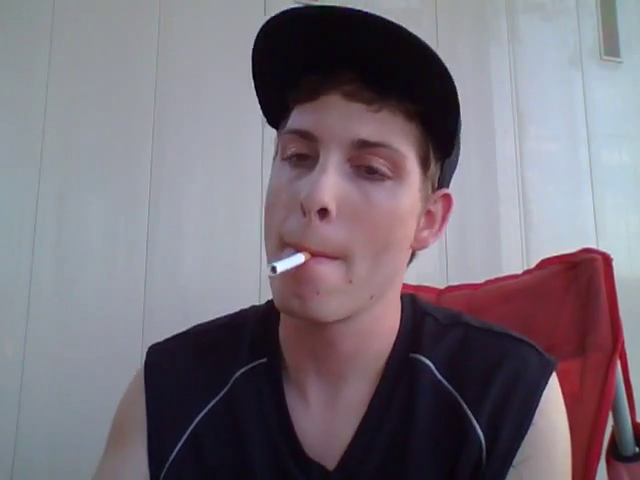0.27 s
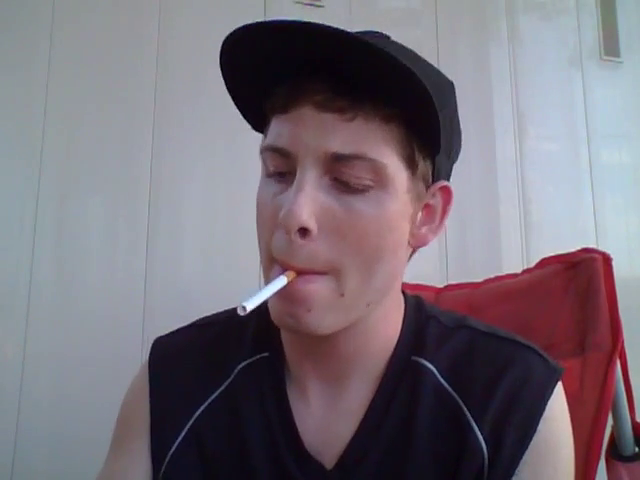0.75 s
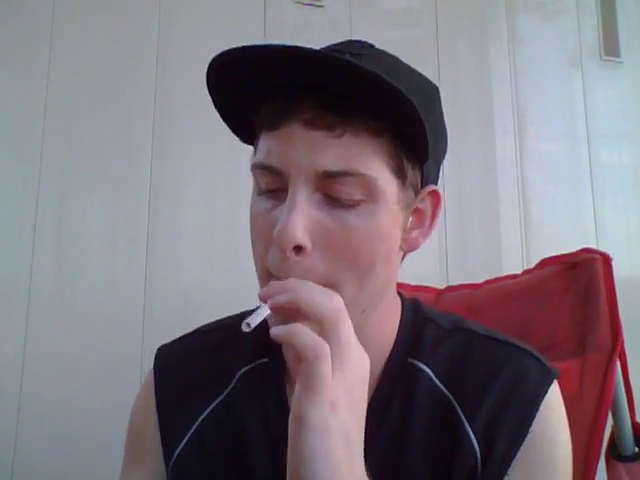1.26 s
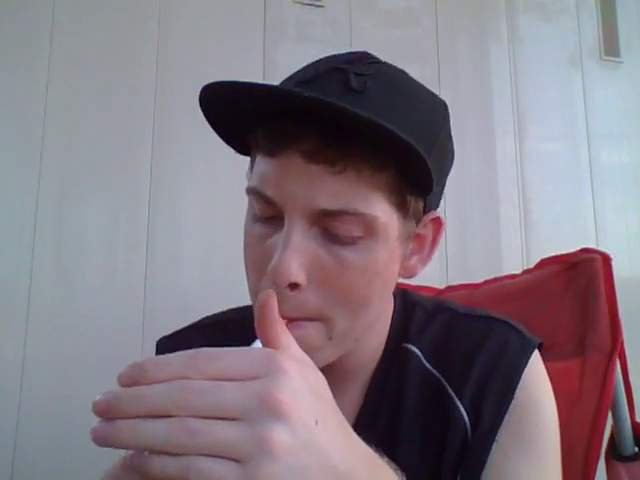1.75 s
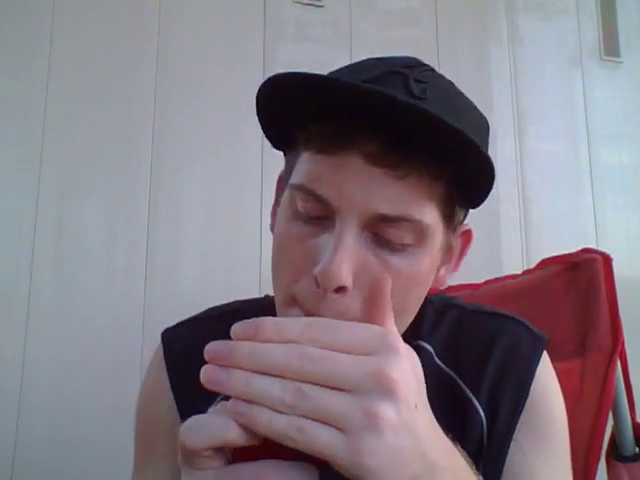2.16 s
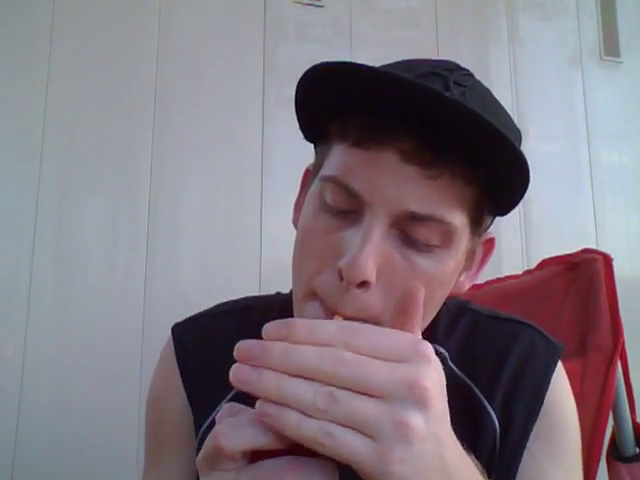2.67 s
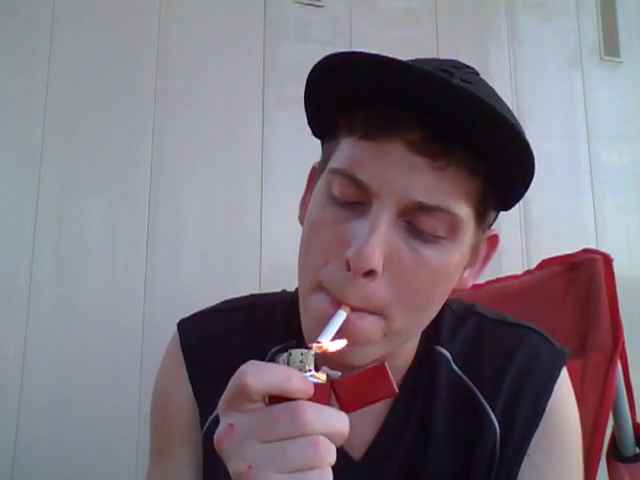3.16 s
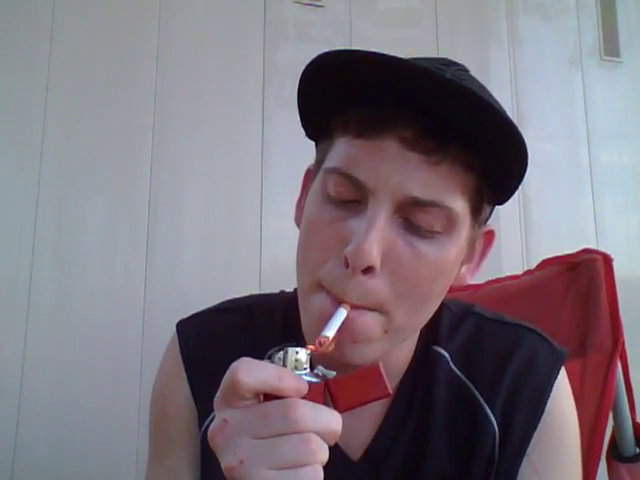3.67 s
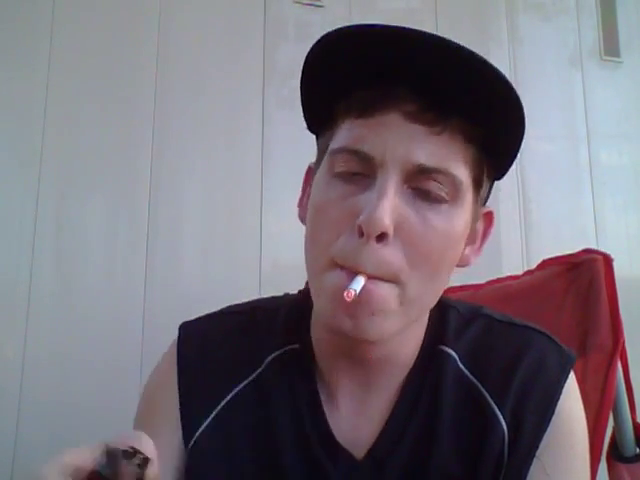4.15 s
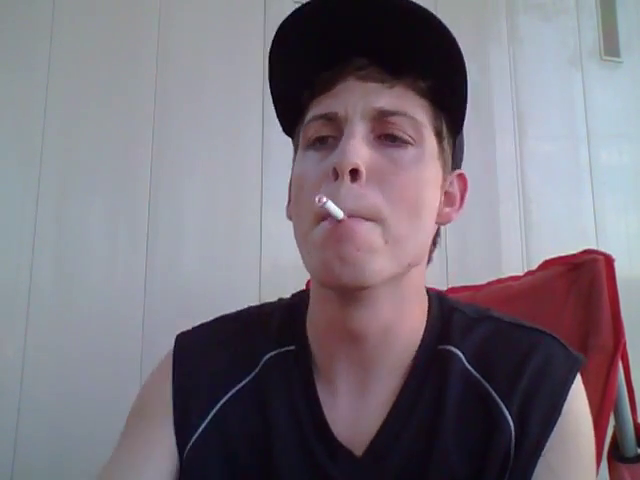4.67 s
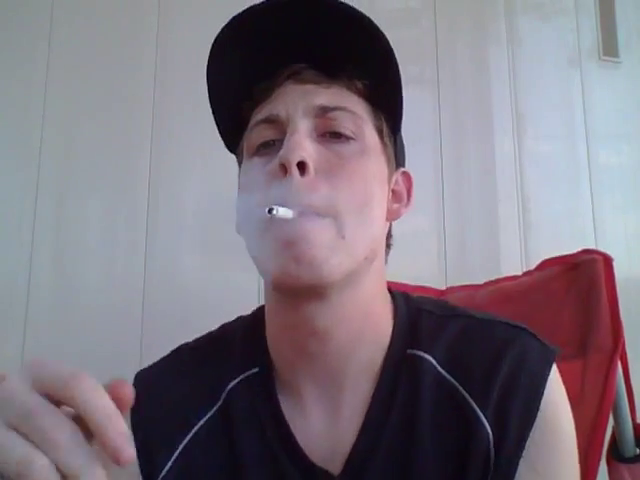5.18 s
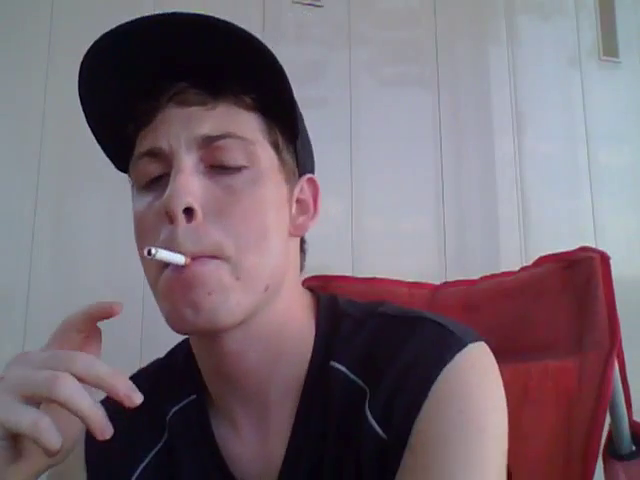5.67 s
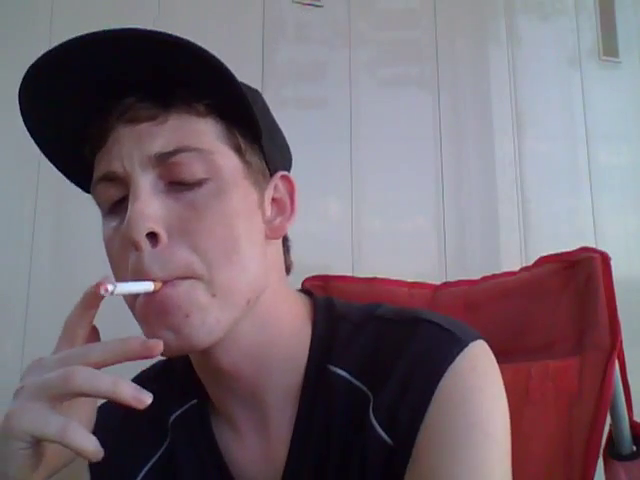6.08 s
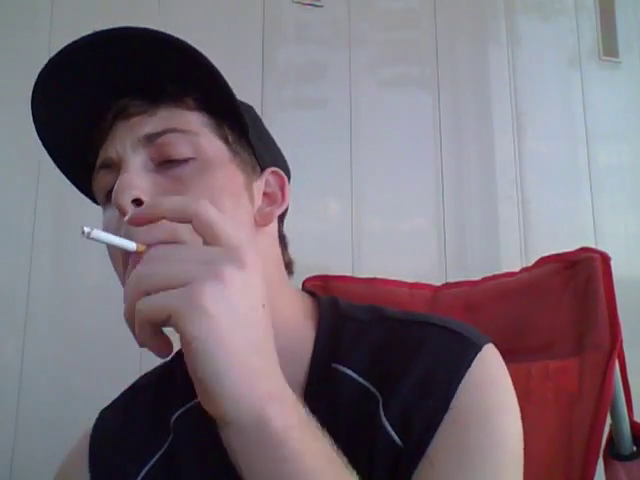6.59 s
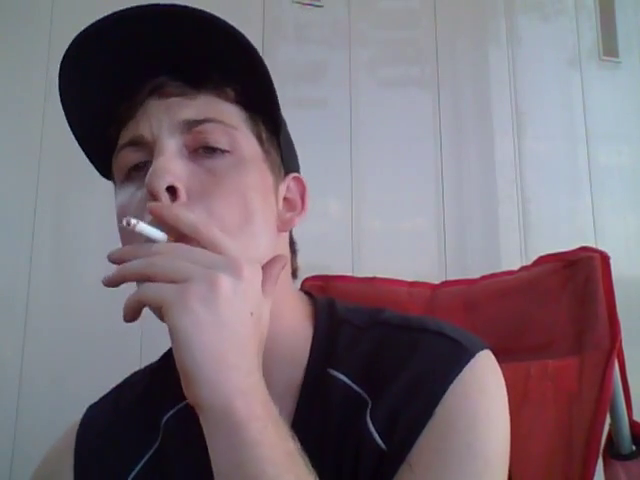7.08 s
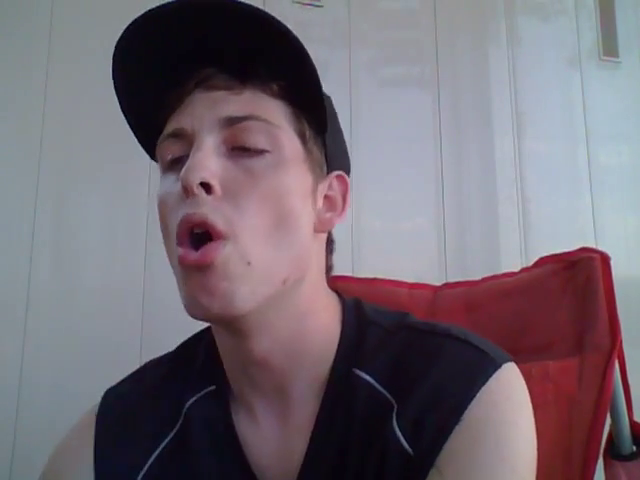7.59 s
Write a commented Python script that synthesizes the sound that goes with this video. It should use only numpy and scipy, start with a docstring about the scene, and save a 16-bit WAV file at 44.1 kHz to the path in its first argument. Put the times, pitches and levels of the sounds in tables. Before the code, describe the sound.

Over quiet outdoor hiss and faint birdsong, a metal lighter clinks open, scrapes twice, snaps shut hard, then lands with a bouncing knock.

```python
"""Flip lighter on a quiet porch

A metal lighter is worked close to a computer's two-port microphone: ringing modes make the lid clink open,
snap shut and clatter onto the table; rough noise makes two flint strokes, low noise the fluttering flame.
Soft noise makes bumps, a hand swing and a lip pop. Behind are outdoor hiss, a faint whine, a high whistle
and a far songbird of gliding tones. The loud clacks push the input gain down and overload it.
"""
import sys
import numpy as np
from scipy import signal
from scipy.fft import rfft, irfft, next_fast_len
from scipy.io import wavfile

SR = 44100
rng = np.random.default_rng(int(sys.argv[2]) if len(sys.argv) > 2 else 0)


def dump_mix(stems):
    """Bounce the given channels to the path in sys.argv[1] as a 16-bit WAV at rate SR."""
    frames = np.atleast_2d(stems).T  # one column per channel
    limited = np.clip(frames, -1, 1)  # hard clip at full scale
    pcm = np.round(limited * 32767).astype(np.int16)
    wavfile.write(sys.argv[1], SR, pcm)


N = 345655
TIME = np.arange(N) / SR   # s
PORT_GAP_S = .000381   # time sound needs from one microphone port to the other

# ringing of the closed case, damped by the hand: [f/Hz, level/dB, time to fall 60 dB/s]
SHUT_CASE_MODES = [(1140, -28, .008), (2300, -26, 0.0082), (3020, -10.5, 0.0069), (3680, -13.5, .005),
                   (4524, -10, 0.0023), (6150, -17, 0.0068), (6700, -33.5, 0.063), (8100, 2, 0.0087),
                   (8520, -39, 0.19), (7920, -11.5, 0.034), (8900, -41, 0.077), (11450, -12, 0.005)]


def from_db(db):
    """Turns decibels into an amplitude factor."""
    return 10 ** (np.asarray(db) / 20)


def rms_one(x):
    """Scales a sound to an average (rms) strength of 1."""
    return x / np.sqrt(np.mean(x ** 2) + 1e-20)


def at_hz(points, hz):
    """Reads a table between its points, on a log-frequency axis."""
    known_hz, values = np.transpose(points)
    return np.interp(np.log(hz + 1e-9), np.log(known_hz), values)


def filtered(x, response):
    """Applies a frequency response, given as a function of Hz."""
    size = next_fast_len(N + SR // 10)
    hz = np.fft.rfftfreq(size, 1 / SR)
    return irfft(rfft(x, size) * response(hz), size)[..., :N]


def delayed(x, lag_s):
    """Delays a sound, even by a fraction of a sample, by turning the phase of each frequency."""
    return filtered(x, lambda hz: np.exp(-2j * np.pi * hz * lag_s))


def coloured(x, spectrum):
    """Gives a noise its spectrum, then scales it to rms 1."""
    return rms_one(filtered(x, lambda hz: from_db(at_hz(spectrum, hz))))


def smoothed(x, time_s):
    """Makes a signal follow its input sluggishly (one-pole lag)."""
    keep = np.exp(-1 / (time_s * SR))
    return signal.lfilter([1 - keep], [1, -keep], x + 1e-18)


def band_passed(x, order, low_hz, high_hz):
    """Keeps the frequencies between two edges."""
    return signal.sosfilt(signal.butter(order, [low_hz, high_hz], "band", fs=SR, output="sos"), x)


def high_passed(x, order, edge_hz):
    """Weakens the frequencies below an edge."""
    return signal.sosfilt(signal.butter(order, edge_hz, "high", fs=SR, output="sos"), x)


def swells(rows):
    """Loudness curve of events that grow and die exponentially: [peak t/s, level/dB, rise/s, fall/s]."""
    total = np.zeros(N)
    for peak_s, db, rise_s, fall_s in rows:
        growth = np.minimum((TIME - peak_s) / rise_s, (peak_s - TIME) / fall_s)
        total += from_db(db) * np.exp(np.maximum(growth, -20))
    return total


def held(start_s, end_s, attack_s, release_s):
    """Loudness curve that rises, holds and dies away."""
    rise = 1 - np.exp(-np.maximum(TIME - start_s, 0) / attack_s)
    return rise * np.exp(-np.clip((TIME - end_s) / release_s, 0, 20))


def struck(hits, modes, crack_db, crack_s, crack_low_hz, crack_top_hz):
    """Each blow rings all modes, with a short crack of rough contact that differs at the two ports."""
    t, out = TIME[:SR // 3], np.zeros((2, N))
    for hit_s, db, brightness in hits:
        ring = np.zeros(len(t))
        for hz, level_db, t60_s in modes:
            tilt_db = brightness * np.log2(hz / 5000)   # brightness is in dB per octave around 5 kHz
            ring += from_db(level_db + tilt_db - 60 * t / t60_s) * np.sin(2 * np.pi * hz * t)
        burst = from_db(crack_db) * np.exp(-t / crack_s) * rng.standard_normal((2, len(t)))
        crack = band_passed(burst, 2, crack_low_hz, crack_top_hz)
        # the lighter is to the right: the left port hears its ring later and weaker
        left_ring = from_db(-15) * np.interp(t - PORT_GAP_S, t, ring)
        start = round(hit_s * SR)
        out[:, start:start + len(t)] += from_db(db) * (crack + [left_ring, ring])
    return out


def porch(x, near_db, near_s, tail_db):
    """A quick scatter off hand, screen and table, then a faint tail that dies band by band."""
    # how long the porch echoes: [f/Hz, time to fall 60 dB/s]
    echo_times = [(150, 0.51), (500, 0.29), (2000, 0.17), (4000, .15), (6000, 0.23), (8700, .36),
                  (14000, .2)]
    t = TIME[:SR // 3]
    edges_hz = np.geomspace(100, 16000, 8)
    tail = 0
    for low_hz, high_hz in zip(edges_hz, edges_hz[1:]):
        band = band_passed(rng.standard_normal((2, len(t))), 2, low_hz, high_hz)
        t60_s = at_hz(echo_times, np.sqrt(low_hz * high_hz))
        tail = tail + band * np.exp(-np.log(1000) * t / t60_s)
    near = rng.standard_normal((2, len(t))) * np.exp(-t / near_s) * (t > .0005)
    echoes = from_db(near_db) * rms_one(near) + from_db(tail_db) * rms_one(tail * (t > .005))
    echoes = echoes / np.sqrt(len(t))
    return x + signal.fftconvolve(x[1:], echoes, axes=1)[:, :N]   # the right port's sound feeds the echoes


def outdoors(right_db, count=8):
    """Hiss comes from many directions, more from the right, each with its own lag between the ports."""
    # steady outdoor hiss: [f/Hz, level per Hz/dB]
    air_colour = [(35, -36), (70, -11), (110, -1.5), (230, 0), (500, -9.5), (1000, -13.5), (1600, -14),
                  (2100, -15), (3000, -15.5), (4000, -21.5), (7000, -23), (9000, -20.5), (12000, -33.5),
                  (15500, -27)]
    # far steady whine: [f/Hz, level/dB]
    whine_tones = [(2067, -65.5)]
    ports = 0
    for bearing in np.linspace(-1, 1, count):   # -1 is left, 1 is right
        wave = from_db(right_db * bearing) * rng.standard_normal(N)
        ports = ports + np.array([delayed(wave, bearing * PORT_GAP_S), wave])
    port_time = TIME - .7 * np.array([[PORT_GAP_S], [0]])   # the whine reaches the left port later
    whine = sum(from_db(db) * np.sin(2 * np.pi * hz * port_time) for hz, db in whine_tones)
    return from_db(-54.5) * coloured(ports, air_colour) + whine


def bird(waver_hz, echo_db, echo_s):
    """Phrases of gliding whistles, smeared by echoes from trees and walls."""
    # the four syllables by name: [start f/Hz, end f/Hz, accent/dB]
    bird_syllables = {"high": (3480, 3150, -5), "up": (2940, 3180, 0), "down": (2940, 2480, -1),
                      "low": (2680, 2800, 0)}
    # the phrases: [t/s, names of the syllables, level/dB]
    bird_phrases = [(1.42, "high up", -58), (2.588, "high high down up", -53), (3.315, "low down", -53.5),
                    (3.845, "up down", -51), (3.96, "high", -54), (4.341, "low down", -48),
                    (4.65, "high", -58), (4.99, "down", -59), (5.55, "up down", -52),
                    (6.18, "high low", -52), (6.72, "up down up", -52), (7.26, "high", -51)]
    syllable_s, step_s = .072, .082   # length of every syllable, and time from one start to the next
    along = np.linspace(0, 1, int(syllable_s * SR))
    song = np.zeros(N)
    for phrase_s, names, db in bird_phrases:
        for k, name in enumerate(names.split()):
            start_hz, end_hz, accent_db = bird_syllables[name]
            waver = rms_one(smoothed(rng.standard_normal(SR // 4), .003))[:len(along)]
            pitch_hz = start_hz + (end_hz - start_hz) * along + waver_hz * waver
            tone = np.sin(2 * np.pi * np.cumsum(pitch_hz) / SR)
            start = int((phrase_s + k * step_s) * SR)
            song[start:start + len(along)] += from_db(db + accent_db) * np.sin(np.pi * along) * tone
    t = TIME[:SR // 2]
    echoes = rms_one(rng.standard_normal((2, len(t))) * np.exp(-t / echo_s)) / np.sqrt(len(t))
    echoed = signal.fftconvolve(song[None], echoes, axes=1)[:, :N]
    return song * from_db([[-2], [-10]]) + from_db(echo_db) * echoed   # direct song is louder at the left


def whistle(waver_hz):
    """A thin, faint high tone whose pitch wanders at random."""
    pitch_hz = 9220 + waver_hz * rms_one(smoothed(rng.standard_normal(N), 0.0038))
    loudness = from_db(-74.5) * held(start_s=3.865, end_s=4.04, attack_s=.015, release_s=.015)
    return loudness * np.sin(2 * np.pi * np.cumsum(pitch_hz) / SR)


def soft_bumps(noise):
    """Hand and arm bump dully: a softer contact is both duller and longer."""
    # bumps of hand and arm: [t/s, level/dB, upper edge f/Hz]
    bump_rows = [(2.648, -35, 420), (2.98, -40.5, 350), (3.46, -44, 300), (4.112, -48, 600),
                 (4.2045, -47, 1090), (4.263, -44.5, 1140), (7.10, -44.5, 190.5), (7.22, -41, 227),
                 (7.515, -39.5, 194)]
    rise_cycles, fall_cycles = 1.3, 3.1   # in periods of the upper edge
    out = np.zeros(N)
    for bump_s, db, top_hz in bump_rows:
        contact = swells([(bump_s, db, rise_cycles / top_hz, fall_cycles / top_hz)])
        dull = band_passed(band_passed(noise, 2, 70, top_hz), 2, 70, top_hz)
        out += contact * rms_one(dull)
    return out


def hand_swing(noise):
    """The hand swings to throw the lid shut: a low rush of air and cloth, made of shaped noise."""
    # rush of air and cloth: [f/Hz, level per Hz/dB]
    rush_colour = [(40, -24), (100, -2), (320, 0), (600, -11), (1300, -22), (2200, -39), (6000, -50)]
    loudness = from_db(-40) * held(start_s=4.339, end_s=4.392, attack_s=.004, release_s=.012)
    return loudness * coloured(noise, rush_colour)


def lips(noise):
    """The lips let go of the cigarette: a small pop of mostly low noise."""
    # pops: [t/s, level/dB, rise/s, fall/s]
    pop_rows = [(7.433, -44.5, 0.0009, 0.0058)]
    # tone colour of the pop: [f/Hz, level/dB]
    lip_colour = [(150, -7), (500, -1), (1800, -2.5), (2600, -20), (9000, -29), (15000, -35)]
    return swells(pop_rows) * coloured(noise, lip_colour)


def soft_sounds():
    """Bumps, hand swing and lips come from straight ahead, so they are alike at both ports."""
    bump_noise, pop_noise, rush_noise = rng.standard_normal((3, N))
    return lips(pop_noise) + hand_swing(rush_noise) + soft_bumps(bump_noise)


def flame():
    """The vapour catches with a deep puff, then the wick flutters quietly until the lid snuffs it."""
    # burning wick: [f/Hz, level per Hz/dB]
    wick_colour = [(35, -23), (80, 2.5), (260, 8.5), (500, -6.5), (1500, -24.5)]
    lit_s, snuffed_s, edge_s, puff_hz = 2.635, 4.39, .01, 85
    puff_noise, flutter_noise = rng.standard_normal((2, N))
    puff = rms_one(band_passed(puff_noise, 2, puff_hz / np.sqrt(2), puff_hz * np.sqrt(2)))   # one octave
    puff = puff * swells([(lit_s, -55.5, edge_s, .18)])
    burning = from_db(-68) * held(lit_s, snuffed_s, edge_s, edge_s)
    return puff + burning * coloured(flutter_noise, wick_colour)


def flint(grain_db):
    """The wheel's teeth tear at the flint in a growing run of uneven snaps until it breaks free."""
    # wheel strokes: [t when the wheel breaks free/s, grinding level/dB, final snap level/dB]
    stroke_rows = [(2.104, -36, -36), (2.638, -36, -25.5)]
    # fingers brushing the metal and the table, with the same grain: [t/s, level/dB, fall/s]
    brush_rows = [(2.1155, -44, .0021), (5.53, -55, .061)]
    # tone colour of the rasp: [f/Hz, level/dB]
    flint_colour = [(200, -9), (900, -8.5), (1700, 0), (2800, 1), (4000, -4), (5200, -5.5), (6650, 4),
                    (7600, 2), (9000, 1.5), (12000, -10), (15500, -12)]
    grind_rise_s, grind_fall_s, snap_s, brush_rise_s = 0.0087, 0.0061, .0013, 0.0011
    bite = rms_one(smoothed(rng.standard_normal(N), .00015))
    snaps = rng.standard_normal((2, N)) * from_db(grain_db * np.tanh(bite))   # uneven grain
    grinding = swells((s, db, grind_rise_s, grind_fall_s) for s, db, _ in stroke_rows)
    breaking = swells((s, db, snap_s, snap_s) for s, _, db in stroke_rows)
    brushing = swells((s, db, brush_rise_s, fall_s) for s, db, fall_s in brush_rows)
    rasp = (grinding + breaking + brushing) * coloured(snaps, flint_colour)
    return porch(rasp, near_db=-21, near_s=0.0029, tail_db=-22.5)


def landing():
    """Each bounce drums on the table top, whose close modes blur into a short rumble, and clicks the case."""
    # bounces on the table: [t/s, thud level/dB, metal click level before a shared cut/dB]
    bounce_rows = [(5.058, 7, -4), (5.0847, 4.5, -1), (5.0997, 2.5, -10), (5.134, -7.5, -18)]
    # table top, ringing modes and broad ones for punch: [f/Hz, level/dB, time to fall 60 dB/s]
    table_modes = [(124, -25, .06), (190, -21.5, .06), (236, -14, 0.14), (313, -9.5, 0.086),
                   (377.6, -14.5, .14), (438.4, -13.5, .08), (524, -15, 0.059), (534, 2.5, 0.01),
                   (630.6, -12.5, 0.028), (832, -18.5, 0.028), (1220, -21, 0.061), (1001, -16.5, .012),
                   (1400, -9, .011), (1378, -20.5, 0.058), (1746, -21.5, .03), (2140, -11, 0.012),
                   (4540, -30.5, 0.011)]
    # shortly after each bounce the other edge touches down, more lightly
    edge_lag_s, edge_thud_db, edge_click_db = .0075, -15, -12.5
    far_edge = [(s + edge_lag_s, thud + edge_thud_db, click + edge_click_db) for s, thud, click in bounce_rows]
    touches = bounce_rows + far_edge
    thud_hits = [(s, db, 0) for s, db, _ in touches]
    thuds = struck(thud_hits, table_modes, crack_db=1.5, crack_s=.012, crack_low_hz=230, crack_top_hz=740)
    thuds = high_passed(thuds, 1, 150)   # the thuds carry little deep bass
    click_hits = [(s, db - 9.5, -2) for s, _, db in touches]
    clicks = struck(click_hits, SHUT_CASE_MODES, crack_db=13, crack_s=0.0013,
                    crack_low_hz=1100, crack_top_hz=6400)
    return porch(thuds + clicks, near_db=-20, near_s=.006, tail_db=-28)


def lid():
    """Open, the lid rings like a small bell; shut, the case gives a short bright clack."""
    # lid flicked open, then rattling on its hinge: [t/s, level/dB, brightness/dB per octave]
    opening_hits = [(0.5622, -15.5, 15), (0.5627, -7, -4.5), (0.569, -26, 2), (0.584, -34, -10),
                    (0.632, -37.5, -4)]
    # open lid and case: [f/Hz, level/dB, time to fall 60 dB/s]
    open_case_modes = [(2360, -25, .022), (2970, -9, .014), (3320, -16, 0.0095), (5546, -20, 0.018),
                       (5520, 0.5, 0.028), (5550, -43, .12), (5730, -44.5, .1), (6250, -22, .01),
                       (7450, -24, .08), (8360, -41, .11), (8500, -26, 0.15), (8600, -21, 0.014),
                       (9200, -17.5, 0.017), (9600, -44, 0.038), (11200, -26, 0.0073),
                       (11760, -35.5, 0.029), (14300, -34, .008)]
    # lid snapped shut, the cam first and then the rim: [t/s, level/dB, brightness/dB per octave]
    closing_hits = [(4.387, -42.5, 0), (4.4073, -12, 1.5), (4.4078, -7, 7), (4.4103, 2, -3),
                    (4.4115, -20, -1)]
    # hinge ticking as the hand drops: [t/s, level/dB, brightness/dB per octave]
    tick_hits = [(4.2625, -40, 0)]
    # ringing of the hinge: [f/Hz, level/dB, time to fall 60 dB/s]
    tick_modes = [(4450, 2, 0.024), (6400, -7.5, 0.022)]
    opens = struck(opening_hits, open_case_modes, crack_db=-12, crack_s=.0006,
                   crack_low_hz=5020, crack_top_hz=11100)
    # so small a shell radiates no bass
    opens = signal.sosfilt(signal.cheby1(8, 1, 2150, "high", fs=SR, output="sos"), opens)
    shuts = struck(closing_hits, SHUT_CASE_MODES, crack_db=-1.5, crack_s=0.00074,
                   crack_low_hz=2800, crack_top_hz=7000)
    shuts = high_passed(shuts, 1, 1500)
    ticks = struck(tick_hits, tick_modes, crack_db=-3.5, crack_s=.002, crack_low_hz=2000, crack_top_hz=9000)
    opens = porch(opens, near_db=-14, near_s=.003, tail_db=-23)
    return opens + porch(shuts + ticks, near_db=-21, near_s=0.0033, tail_db=-27.5)


def scene():
    """Adds the far sounds of the outdoors to the near sounds of the lighter and the hand."""
    far = outdoors(right_db=5) + bird(waver_hz=70, echo_db=-1.5, echo_s=.08) + whistle(waver_hz=70)
    return far + soft_sounds() + flame() + flint(grain_db=4.5) + landing() + lid()


def gain_control(x, threshold_db, slope, window_s, attack_s, recovery_db):
    """Loud sounds push the gain down; it creeps back by recovery_db a second."""
    level_db = 10 * np.log10(smoothed(np.mean(x ** 2, axis=0), window_s))
    cut_db = slope * np.maximum(level_db - threshold_db, 0)
    recovered_db = recovery_db * TIME
    held_db = np.maximum.accumulate(cut_db + recovered_db) - recovered_db
    return x * from_db(-smoothed(held_db, attack_s))


def record(dry):
    """Subtracts the other port, delayed, to form left and right beams; then gain control and overload."""
    beams = dry - .98 * delayed(dry[::-1], PORT_GAP_S)
    beams = high_passed(beams, 2, 35)
    # the capsules lose the top treble
    beams = signal.sosfilt(signal.butter(2, 13000, "low", fs=SR, output="sos"), beams)
    levelled = gain_control(beams, threshold_db=-26.5, slope=0.48, window_s=.012, attack_s=0.07, recovery_db=3.5)
    overloaded = np.clip(levelled, -1, 1)
    # steep upper limit at 15750 Hz
    return signal.sosfilt(signal.ellip(12, .3, 90, 15750, fs=SR, output="sos"), overloaded)


dry = scene()
out = record(dry)
dump_mix(out)
```